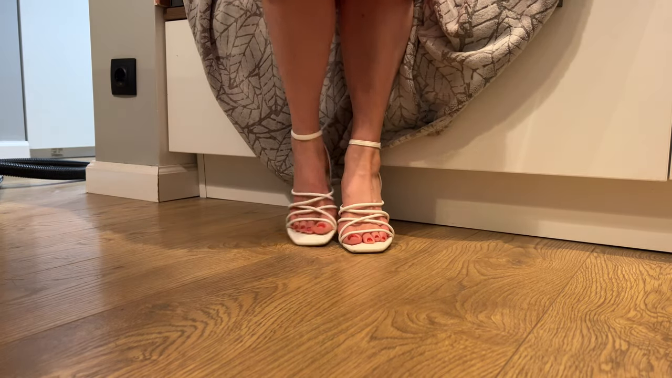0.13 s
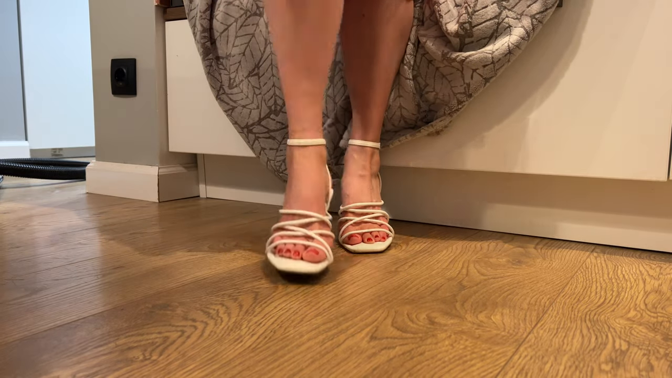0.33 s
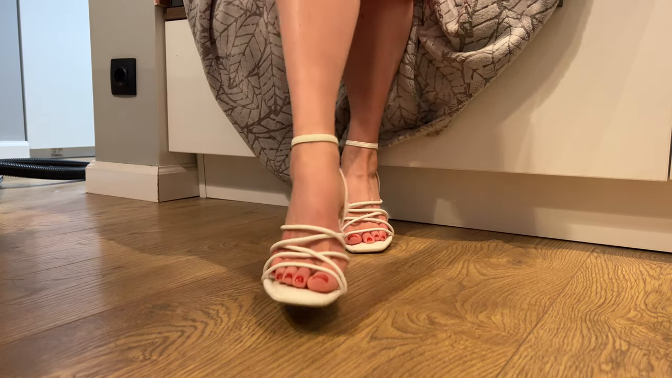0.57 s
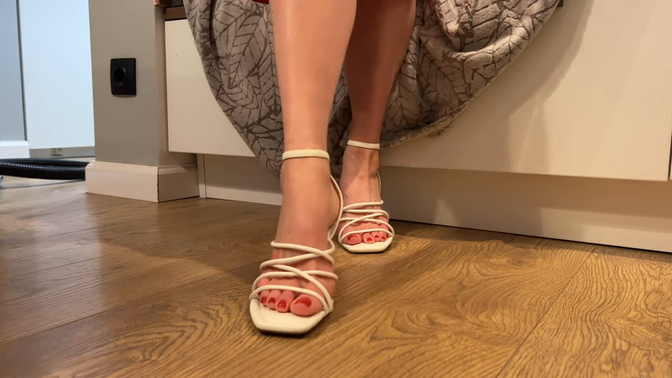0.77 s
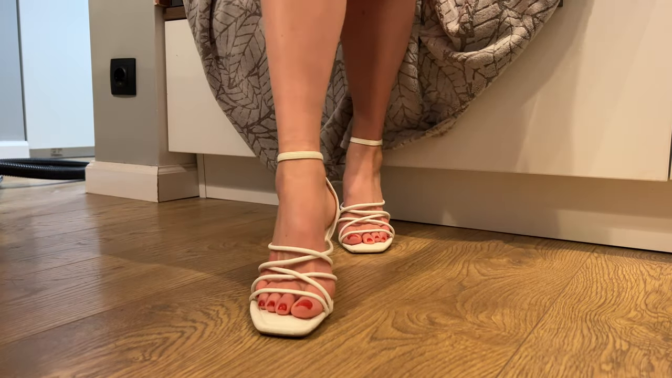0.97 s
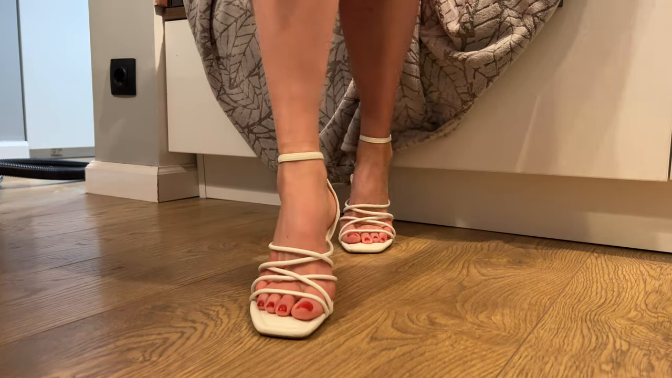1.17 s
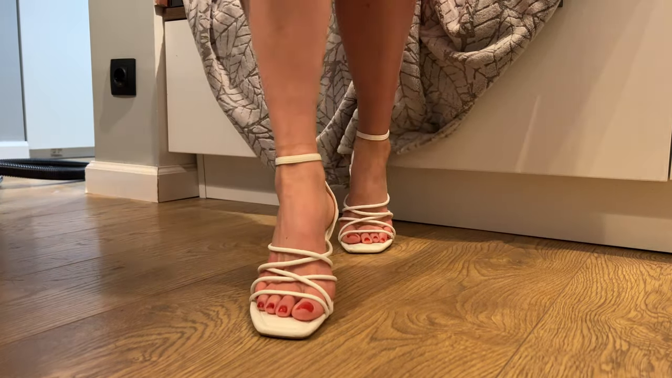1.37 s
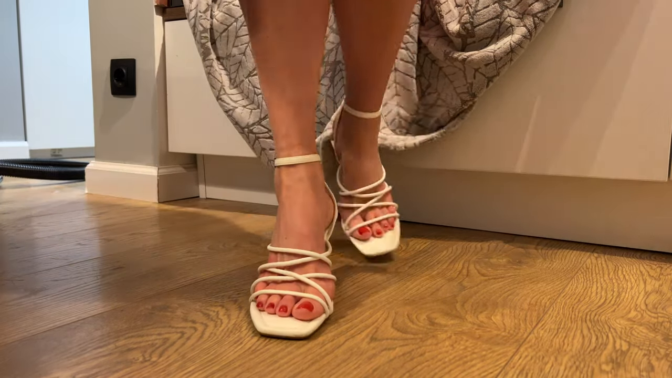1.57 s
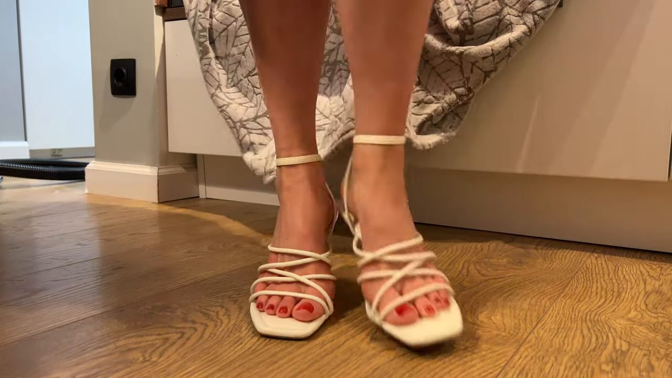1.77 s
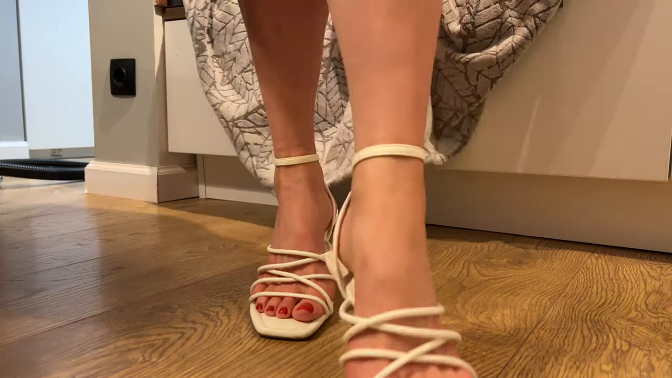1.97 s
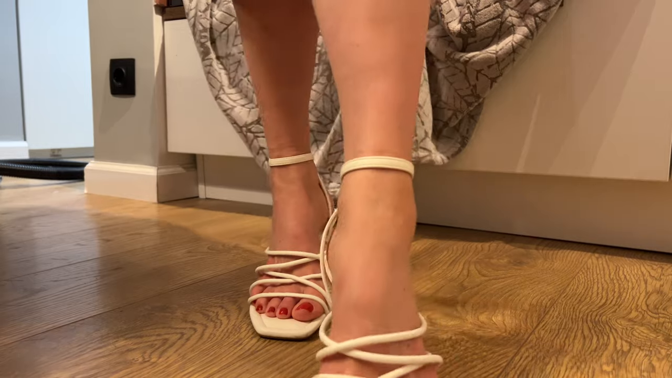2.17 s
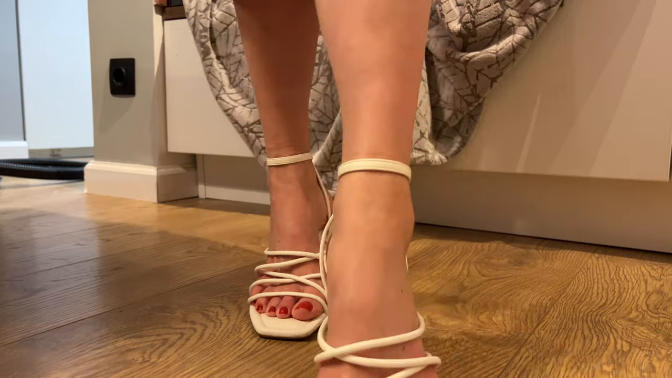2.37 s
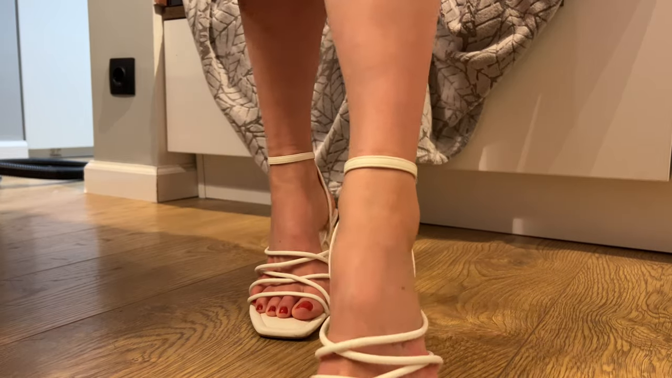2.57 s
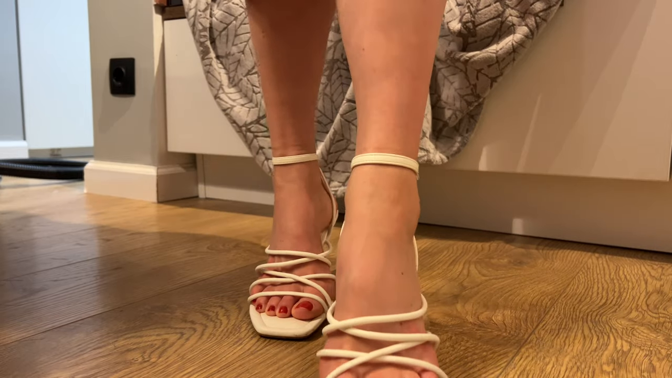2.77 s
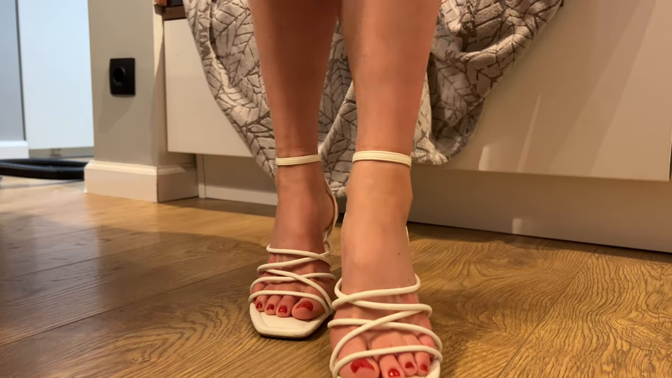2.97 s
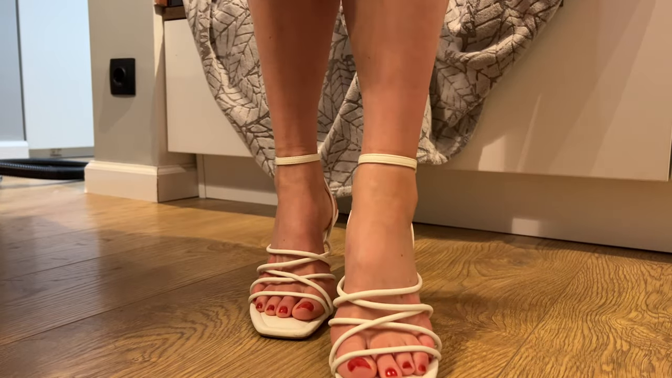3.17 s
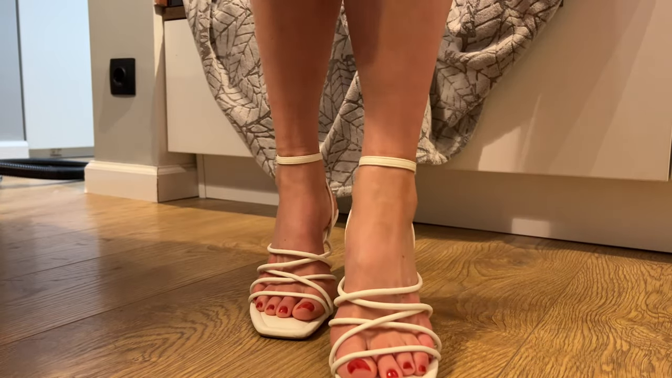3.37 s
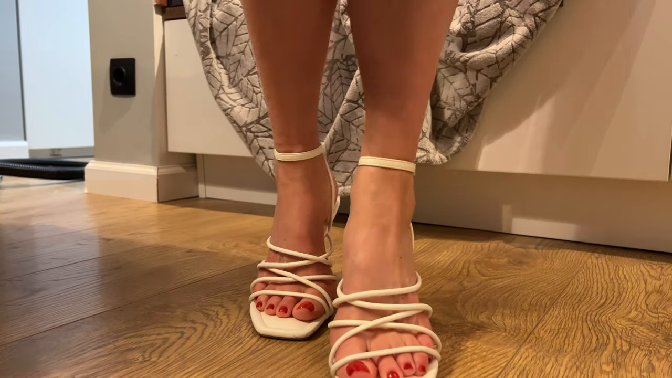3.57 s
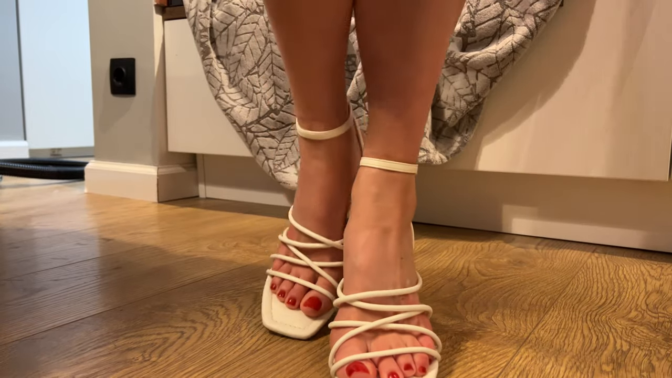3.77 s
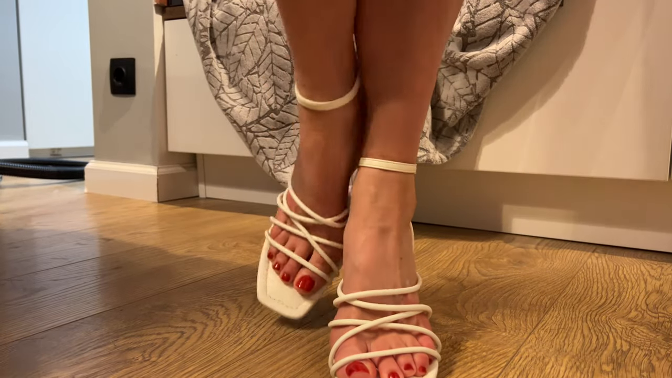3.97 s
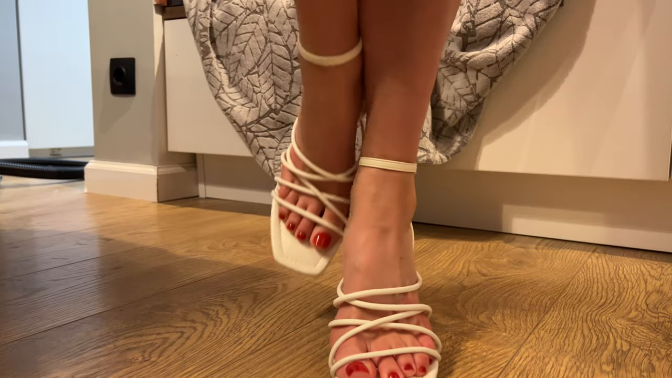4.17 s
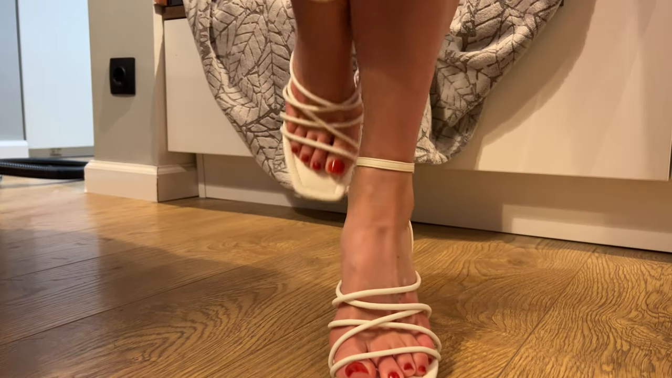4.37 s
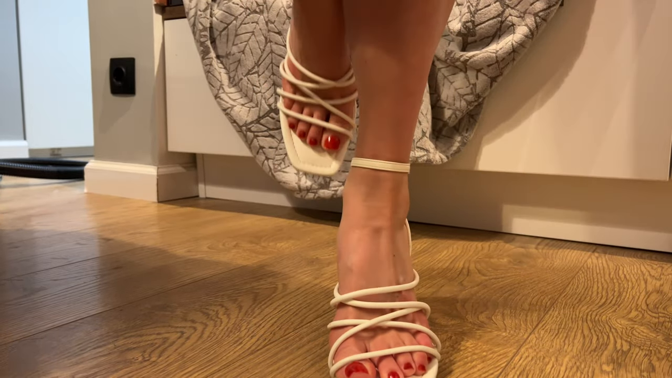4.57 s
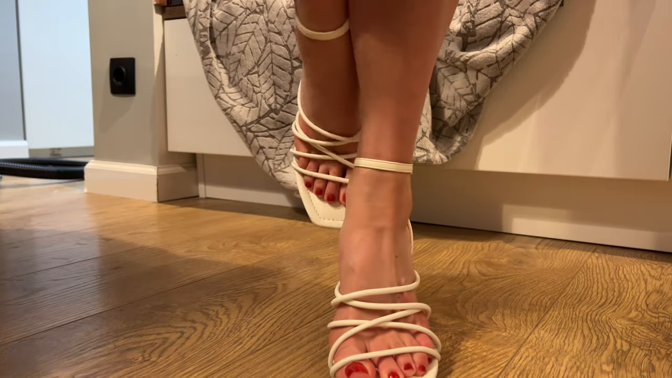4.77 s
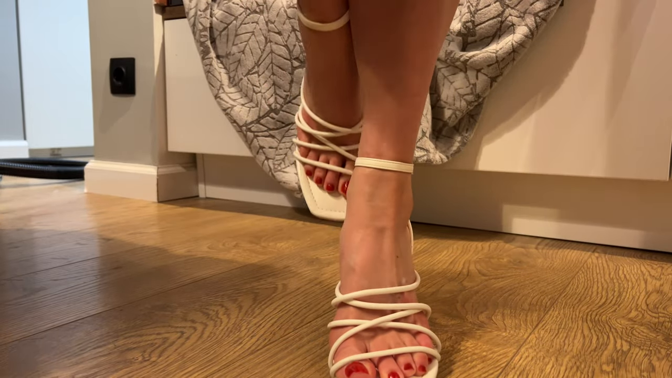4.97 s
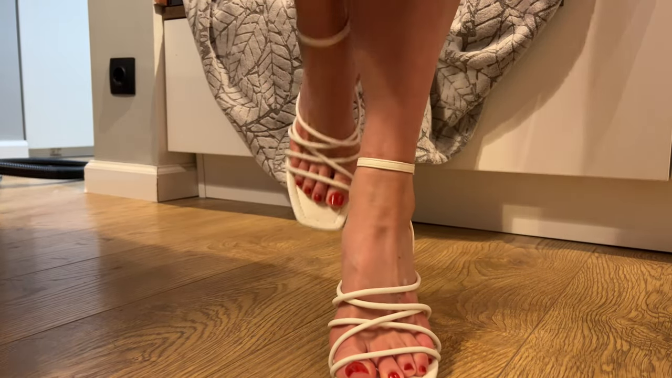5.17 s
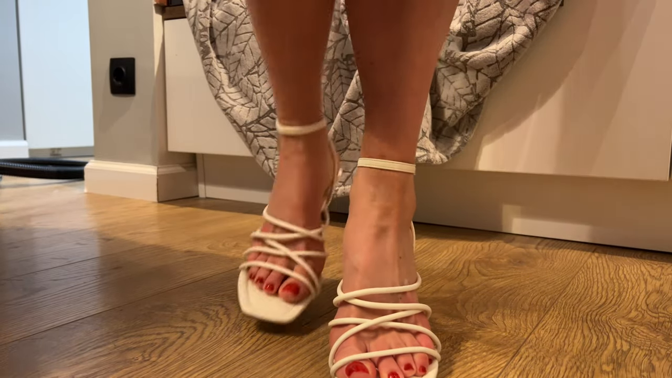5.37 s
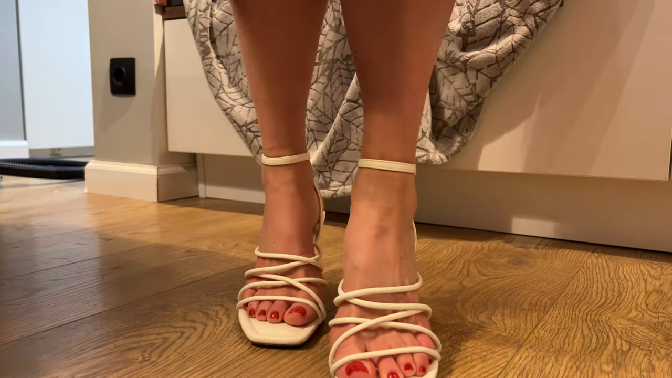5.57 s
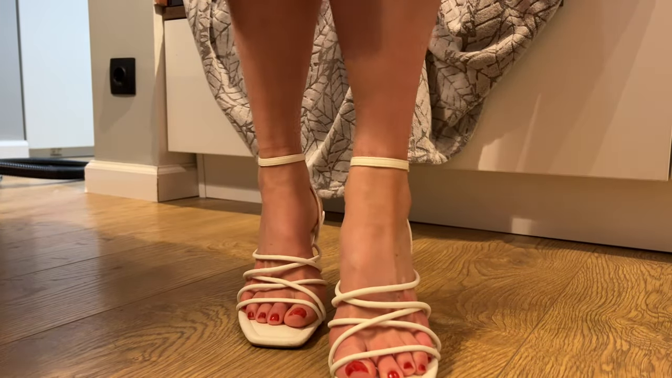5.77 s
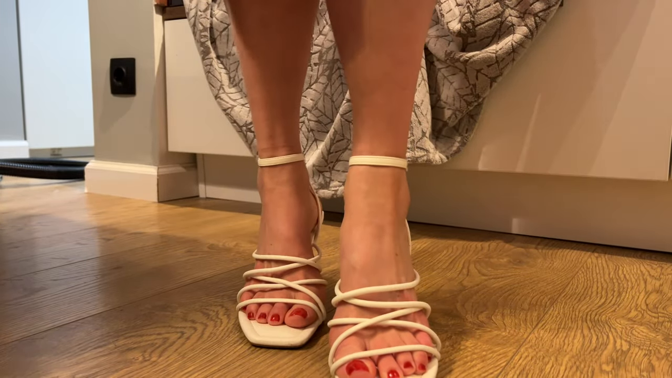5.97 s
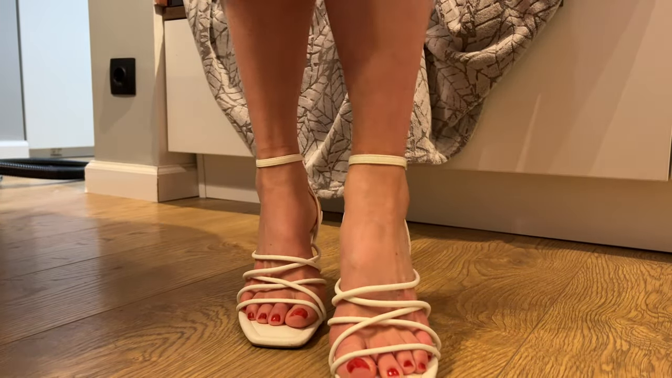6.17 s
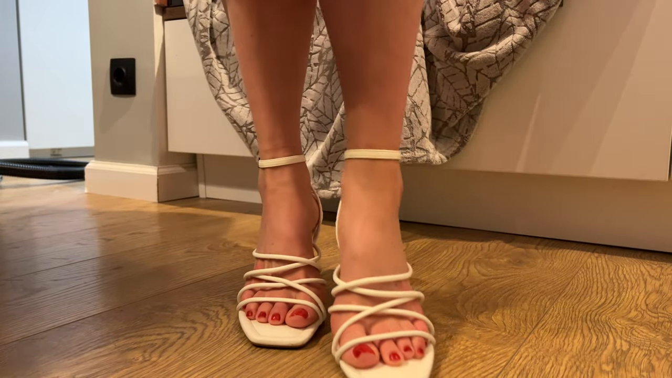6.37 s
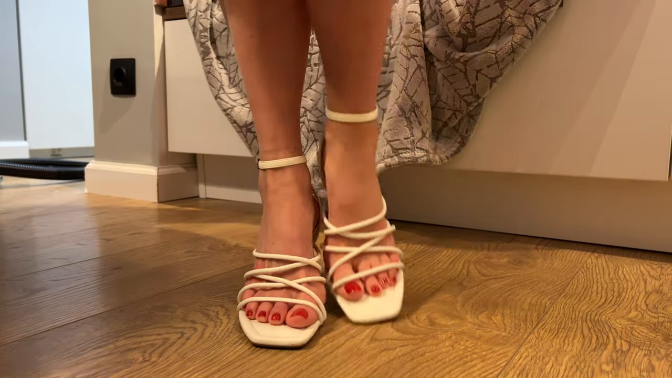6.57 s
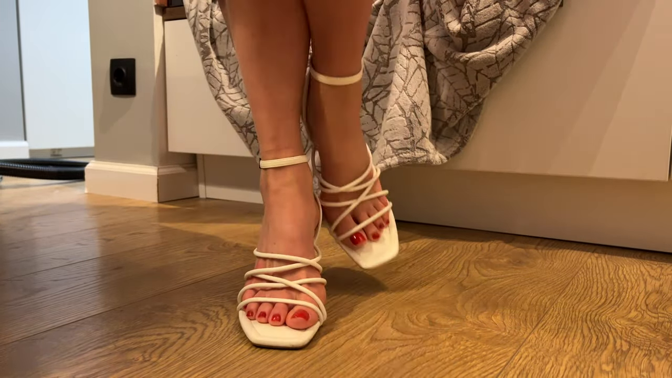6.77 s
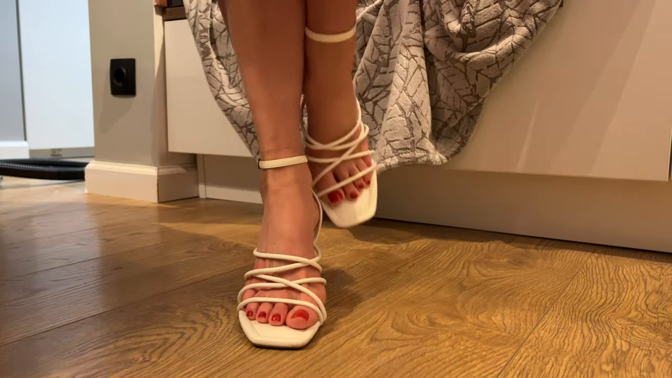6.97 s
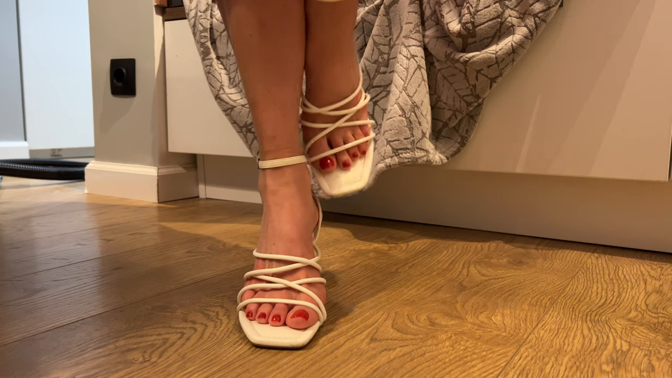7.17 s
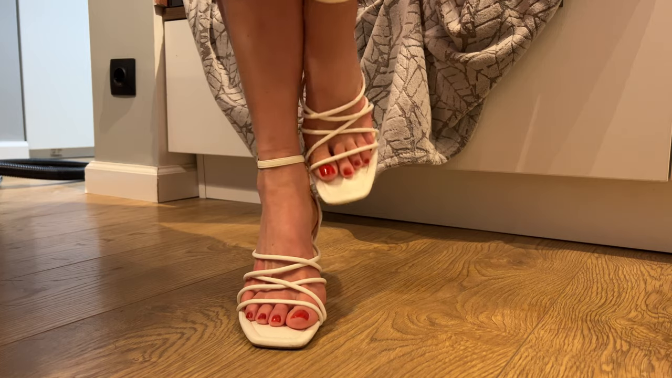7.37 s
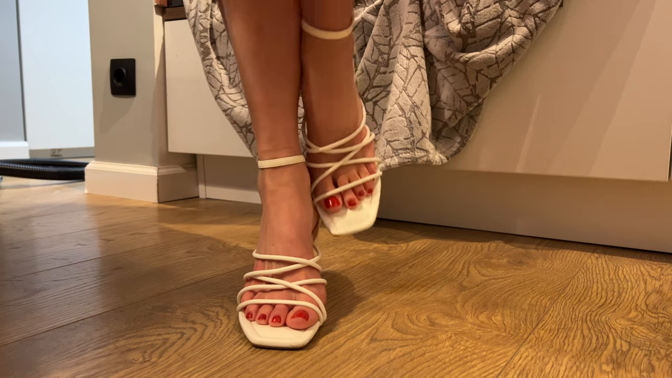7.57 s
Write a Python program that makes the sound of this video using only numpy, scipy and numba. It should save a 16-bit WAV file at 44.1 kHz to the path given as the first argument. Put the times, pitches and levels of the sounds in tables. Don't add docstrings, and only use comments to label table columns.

```python
import sys
import numpy as np
from scipy import signal
from scipy.fft import rfft, irfft, next_fast_len
from scipy.io import wavfile
from scipy.ndimage import uniform_filter1d
from numba import njit

SR = 44100
rng = np.random.default_rng(int(sys.argv[2]) if len(sys.argv) > 2 else 0)


def generate_wav(signal):
    frames = np.transpose(np.atleast_2d(signal))
    scaled = np.clip(frames, -1, 1) * 32767
    pcm = np.round(scaled).astype(np.int16)
    wavfile.write(sys.argv[1], SR, pcm)


def field_ratio(decibels):
    return 10 ** (np.asarray(decibels, dtype=float) / 20)


N = 335601
T = np.arange(N) / SR
SIZE = next_fast_len(N + SR)


def unit(x):
    return x / np.sqrt(np.mean(x ** 2))


def colour(x, points):
    hz, db = np.transpose(points)
    f = np.maximum(np.fft.rfftfreq(SIZE, 1 / SR), 1)
    gain = field_ratio(np.interp(np.log(f), np.log(hz), db, left=-90, right=-90))
    return irfft(rfft(x, SIZE) * gain, SIZE)[..., :N]


def band(x, lo_hz, hi_hz, order=2):
    sos = signal.butter(order, [lo_hz, min(hi_hz, 20000)], "band", fs=SR, output="sos")
    return signal.sosfilt(sos, x)


def walk(rate):
    k = int(SR / rate)
    levels = np.repeat(rng.standard_normal(N // k + 1), k)
    smooth = uniform_filter1d(uniform_filter1d(levels, k), k)
    return unit(smooth[:N])


def pair(mid, side):
    return np.array([mid + side, mid - side])


def panned(x, pan_db):
    return np.array([x * field_ratio(pan_db / 2), x * field_ratio(-pan_db / 2)])


@njit
def svf(x, hz, q):
    y, b, l = np.empty(len(x)), 0., 0.
    for i in range(len(x)):
        g = np.tan(np.pi * hz[i] / SR)
        v = (b + g * (x[i] - l)) / (1 + g * (g + 1 / q))
        b, l, y[i] = 2 * v - b, l + 2 * g * v, v / q
    return y


def air():
    # pitch_hz, level_db
    air_mid = [(25, -51), (40, -1.5), (60, 3.5), (90, 3), (150, -3.5), (300, -8.5), (420, -10), (600, -16),
               (1000, -18), (1300, -29.5), (1700, -26), (3000, -39), (8000, -40.5), (15900, -38.5)]
    air_side = [(25, -25), (60, 0.5), (150, -5), (300, -10), (600, -14), (1200, -25), (1700, -31.5),
                (3000, -39.5), (8000, -40), (11500, -59), (12500, -77), (15900, -81.5)]
    mid = colour(rng.standard_normal(N), air_mid)
    side = colour(rng.standard_normal(N), air_side)
    return pair(mid, side) / np.std(mid) * field_ratio(-61 + walk(2.48))


def fridge():
    # pitch_hz, peak_db, crest_s, left_minus_right_db
    hum = [
        (100.02, -37.7, 0, 1.7),
        (200.04, -69, 0, -1),
    ]
    # multiple of the motor speed, peak_db
    motor_orders = [
        (1, -62.5),
        (2, -49),
        (3, -69.5),
        (4, -100),
    ]
    # pitch_hz, width_hz, level_db
    panels = [(214.5, 8.4, -76), (292, 3.3, -78), (400, 0.96, -74), (602, 2.1, -74.5), (1201, 25, -82)]
    motor_hz, beat_crest_s = 49.378, 0.69
    t = T - beat_crest_s
    buzz = sum(panned(field_ratio(db) * np.cos(2 * np.pi * hz * (t - s)), pan_db) for hz, db, s, pan_db in hum)
    motor = sum(field_ratio(db) * np.cos(2 * np.pi * k * motor_hz * t) for k, db in motor_orders)
    casing = 0
    for hz, width, db in panels:
        rattle = svf(rng.standard_normal(N), np.full(N, 1. * hz), hz / width)
        casing = casing + field_ratio(db) * unit(rattle)
    buzz[1] = np.roll(buzz[1], -9)
    return buzz + panned(motor + casing, 0.44)


def strokes(table, weight_db, roundness):
    # lower, upper body (dB per dB of sheen)
    tilt = [-0.36, 0.53]
    edge_db = -23.5
    power = np.zeros((4, N))
    for s, rise, fall, db, sheen_db in table:
        near = slice(max(int((s - 2 * rise) * SR), 0), int((s + 2 * fall) * SR))
        away = np.where(T[near] < s, (s - T[near]) / rise, (T[near] - s) / fall)
        parts_db = np.array([tilt[0] * sheen_db - 3, tilt[1] * sheen_db - 1.5, sheen_db, weight_db])
        power[:, near] += np.outer(field_ratio(parts_db), field_ratio(db + edge_db * away ** roundness)) ** 2
    return power


def brush():
    # crest_s, rise_s, fall_s, body_db, sheen_db (re body)
    scuffs = [(0.005, .03, 0.16, -75, 0), (0.135, 0.082, 0.09, -64, -4.5), (0.7, 0.3, 0.06, -80, 0),
              (1.13, 0.23, 0.067, -83, -9), (1.515, 0.16, 0.11, -74, -2), (1.694, .12, 0.056, -68.5, -0.5),
              (2.0, 0.059, 0.069, -92, 10), (2.68, 0.19, .25, -61, -1), (2.77, .1, .1, -62, 1),
              (2.874, .16, 0.2, -52.5, -3.5), (3.38, 0.053, 0.49, -71, 1), (3.52, 0.088, 0.27, -67.5, 0.5),
              (3.83, 0.11, 0.22, -64, 0.5), (4.03, 0.09, 0.16, -62, -4), (4.77, .02, .08, -61, -5),
              (5.463, 0.0091, 0.044, -69, -19), (5.68, 0.3, 0.093, -70, 3), (6.03, 0.29, 0.077, -76.5, 0.5),
              (6.36, 0.18, 0.22, -73, 3), (6.45, 0.16, 0.18, -56, -2), (6.88, 0.28, 0.14, -70, 4.5)]
    # crest_s, rise_s, fall_s, body_db, sheen_db (re body)
    rubs = [(1.79, 0.035, 0.017, -74, 10.5), (4.13, 0.081, 0.16, -67.5, 3), (4.34, 0.24, .2, -64.5, 7),
            (4.7, 0.069, 0.14, -64.5, 8), (5.02, 0.068, 0.25, -79, 11.5), (5.27, 0.14, 0.18, -63, -0.5),
            (5.4, 0.056, 0.048, -69, -1), (6.69, 0.068, 0.12, -68, 3.5), (6.98, 0.059, 0.31, -66, 5.5),
            (7.17, 0.17, .12, -80.5, 8), (7.45, .07, 0.12, -77, 8), (7.58, 0.13, .2, -72.5, 8),
            (0.85, 0.3, 0.9, -82, 3), (6.48, 0.019, 0.055, -55, -3)]
    # pitch_hz, level_db
    grain_mid = [(350, 7.5), (600, 1.5), (688, -7), (811, 4.5), (881, -3), (2240, -10.5), (3240, -4.5),
                 (4090, -5.5), (4960, -10), (7690, 0), (8350, -3), (10700, -25.5), (11400, -15),
                 (13700, -16), (15900, -24.5)]
    grain_side = [(350, -11), (600, 4), (643, -3), (747, -10.5), (869, -2.5), (1040, -13.5), (2270, -18),
                  (3290, -7.5), (7080, -13), (7580, -7.5), (11300, -23.5), (12400, 0), (13300, -50),
                  (14800, -10.5), (15900, -41.5)]
    rest_db = [-87, -94, -89.5, -83.5]
    part_pan_db = [4.3, 5, 0.3, 1.5]
    part_bands_hz = [(2600, 5400), (5400, 10500), (10500, 17000), (600, 2600)]

    power = strokes(scuffs, weight_db=-1.5, roundness=2.18) + strokes(rubs, weight_db=-13, roundness=3.6)
    gains = np.sqrt(power + field_ratio(np.array(rest_db))[:, None] ** 2)
    grain = rng.standard_normal((2, N)) * field_ratio(2.2 * rng.exponential(size=N))
    mid = colour(grain[0], grain_mid)
    side = field_ratio(1) * colour(grain[1], grain_side)
    out, flicker = 0, walk(30)
    for (lo_hz, hi_hz), gain, pan_db in zip(part_bands_hz, gains, part_pan_db):
        both = band(np.array([mid, side]), lo_hz, hi_hz, order=3)
        hiss = pair(*both) / np.std(both[0])
        out = out + hiss * panned(gain, pan_db) * field_ratio(1.93 * flicker + 1.0 * walk(9))
    return out


def drag():
    # time_s, level_db, board_pitch_hz
    heavy = [
        (2.52, -66.5, 328),
        (2.652, -42.5, 255),
        (2.691, -44.5, 286),
        (2.741, -46, 283),
        (2.79, -37, 301),
        (2.842, -47, 375),
        (2.882, -37, 380),
        (3.016, -54.5, 334),
        (3.129, -80, 278),
    ]
    # time_s, level_db, board_pitch_hz
    light = [
        (6.28, -70, 400),
        (6.311, -62, 400),
        (6.38, -65, 382),
        (6.45, -53, 408),
        (6.53, -63, 402),
        (6.6, -66, 380),
        (6.63, -79, 385),
    ]
    s, db, hz = np.transpose(heavy + light)
    pitch, load_db = np.interp(T, s, hz), np.interp(T, s, db)
    sliding = sum((T > part[0][0]) & (T < part[-1][0]) for part in (heavy, light))
    jolts = rng.standard_normal(N) * (rng.random(N) < 2500 / SR)
    board = unit(band(svf(svf(jolts, pitch, 2.6), pitch, 2.1), 300, 4000, order=2))
    upper = unit(svf(svf(jolts, 1.7 * pitch, 1.1), 1.7 * pitch, 1.1))
    sizzle = unit(svf(rng.standard_normal(N), np.full(N, 4880.), 7.8))
    upper_db = -12 - 0.44 * (load_db + 46)
    rubbing = board + field_ratio(upper_db) * upper + field_ratio(-23.0) * sizzle
    return panned(rubbing * field_ratio(load_db + 1.5) * sliding, .6)


def packet(t, hz, swell_s):
    shape = (t / swell_s * np.exp(1 - t / swell_s)) ** 4
    return shape * np.sin(2 * np.pi * hz * (t + .0006 * (1 - np.exp(-t / .001))))


def graze(t, hz, ring_s):
    tick = np.sin(2 * np.pi * hz * t) * t / ring_s * np.exp(1 - t / ring_s)
    return tick + field_ratio(-16.5) * packet(t, 450, 0.0053)


def blow(t, tick_db, slap_db, hz, tick_hz, crack_db):
    clatter = rng.standard_normal(len(t)) * np.exp(-t / 0.0052)
    tick = band((t == 0) * -1. + 0.13 * clatter, tick_hz / 2.4, tick_hz * 1.092, order=2)
    crack = field_ratio(crack_db) * band(9.0 * (t == 0) + clatter, 2000, 4330, order=1)
    slap = packet(t, 1.46 * hz, 0.0015)
    board = packet(t, .95 * hz, .0036)
    thud = field_ratio(-16.0) * packet(t, 252, 0.0052) + field_ratio(-23) * packet(t, 149.0, 0.013)
    tip = tick / np.abs(tick).max() + crack
    return board + thud + field_ratio(tick_db + 14.0) * tip + field_ratio(slap_db - 1.0) * slap


def knocks():
    # start_s, board_peak_db, tick_db (re board), slap_db (re board), board_pitch_hz
    landings = [(0.726, -16, -39.5, -12.5, 537), (0.88, -26.5, -28, -7.5, 509), (1.06, -40, -33.5, -2, 540),
                (2.132, -22, -43, -14, 432), (2.144, -15.5, -37, -15, 508), (2.493, -48.5, -20.5, -12, 644),
                (3.36, -44, -23.5, -4.5, 516), (3.784, -44.5, -18.5, 6.5, 423),
                (4.008, -37, -16.5, -11, 476), (4.754, -29.5, -37, -7.5, 480),
                (5.458, -49, -18.5, -22, 684), (5.524, -20, -20, -30, 450), (5.593, -20, -37, -4.5, 493),
                (6.28, -40.5, -21, -0.5, 507), (6.396, -30, -28, -20, 530)]
    # start_s, board_peak_db, slap_db
    # (re board), board_pitch_hz
    lesser_knocks = [(0.734, -34, -6.5, 645), (0.743, -23.5, -28, 428), (0.753, -29.5, -6, 587),
                     (0.762, -28, -9, 469), (0.779, -37, -20, 514), (0.823, -41.5, -14, 565),
                     (2.622, -46.5, -27, 510), (0.887, -44, -18, 517), (1.438, -54, -8, 576),
                     (2.152, -29, -24, 488), (2.168, -35, -34, 374), (2.15, -44.5, -32.5, 194),
                     (4.755, -35, -28, 180), (5.534, -35, 11.5, 408), (5.548, -40.5, 13, 573),
                     (5.566, -52, -9, 437), (5.606, -36, -0.5, 660)]
    # start_s, tick_peak_db, tick_pitch_hz, ring_s
    grazes = [(0.078, -45, 2900, 0.00022), (0.143, -52.5, 2380, 0.00093), (0.167, -55, 1500, 0.00054),
              (1.917, -67, 2100, 0.0011), (1.9888, -44, 2010, 0.00018), (3.493, -42, 2410, .0003),
              (3.673, -59, 2200, 0.00054), (4.774, -46.5, 2000, 0.00043), (5.5228, -37.5, 2070, 0.00016),
              (6.364, -60, 2300, 0.00056), (6.385, -59, 2200, .0005), (6.652, -55, 1900, 0.00057),
              (6.664, -55, 1800, 0.0006), (6.688, -55, 2250, .0005), (6.7, -58, 2180, 0.00064)]
    # start_s, tick_peak_db, tick_pitch_hz, ring_s
    hardest = (2.1428, -25, 3800, .00006)
    # start_s, peak_db
    snap_times = [
        (0.876, -38),
        (0.9832, -44),
        (1.7753, -62),
        (2.1428, -37),
        (2.4912, -43.5),
        (3.492, -38),
        (4.0058, -25),
        (5.46, -41),
        (5.5198, -64),
    ]
    out, t = np.zeros(N + SR), T[:2600]
    hits = [(s, db, tick_db, slap_db, hz, 2300, -5.5) for s, db, tick_db, slap_db, hz in landings]
    hits += [(s, db, -32, slap_db, hz, 2000, -6) for s, db, slap_db, hz in lesser_knocks]
    for s, db, *character in hits:
        i = int((s - .001) * SR)
        out[i:i + len(t)] += field_ratio(db) * blow(t, *character)
    for s, db, hz, ring_s in grazes + [hardest]:
        i = int(s * SR)
        out[i:i + len(t)] += field_ratio(db) * graze(t, hz, ring_s)
    snaps = np.zeros(N)
    for s, db in snap_times:
        snaps[int(s * SR)] = field_ratio(db + 8)
    return panned(out[:N] + band(snaps, 5500, 25000), 0.7)


def room(x):
    # delay_s, level_db, left_minus_right_db
    walls = [(.0086, -18.5, 18), (.019, -23.5, -24.5), (0.0237, -18, 10), (.028, -31, 1.5)]
    # pitch_hz, time_to_fade_60_db_s, level_db
    octaves = [(154, 0.78, -19.5), (325, 0.31, -11), (590, 0.21, -9), (1186, 0.31, -4.5),
               (2056, 0.31, -8.5), (5400, 0.27, -4), (9700, 0.25, -6)]
    t = T[:SR // 2]
    shared, *apart = rng.standard_normal((3, len(t)))
    tail = 0
    for hz, t60, db in octaves:
        alike = np.clip(280 / hz, 0, .95)
        noise = alike * shared + np.sqrt(1 - alike ** 2) * np.array(apart)
        ring = band(noise, hz / np.sqrt(2), hz * np.sqrt(2))
        tail = tail + field_ratio(db - 19.5) * ring * np.exp(-np.log(1000) * t / t60)
    echoes = np.zeros_like(tail)
    for s, db, pan_db in walls:
        echoes[:, int(s * SR)] += panned(field_ratio(db), pan_db)
    response = tail * np.clip(t / 0.004, 0, 1) + band(echoes, 60, 2200, order=1)
    response[:, 0] += 1
    return irfft(rfft(x, SIZE) * rfft(response, SIZE), SIZE)[:, :N]


def scene():
    steps = room(knocks() + drag())
    steps[1] = np.roll(steps[1], 1)
    return steps + brush() + fridge() + air()


def band_limit(x):
    return signal.sosfilt(signal.butter(12, 16220, fs=SR, output="sos"), x)


def record(dry):
    # pitch_hz, level_db
    port_sum = [(20, 0), (9000, 0), (9800, -2.5), (10600, -8), (11100, -4), (15500, 2), (15800, -41)]
    port_difference = [(20, 1), (11500, 1), (12200, -21), (13300, -21), (14500, -12), (15500, -1),
                       (15800, -21)]
    # pitch_hz, level_db
    case_tone = [(20, 0), (6600, -0.5), (7200, 2.5), (7600, -5.5), (7950, -2.5), (20000, -3.5)]
    left, right = dry
    mid = colour(colour((left + right) / 2, port_sum), case_tone)
    side = colour((left - right) / 2, port_difference)
    return band_limit(pair(mid, side))


dry = scene()
out = record(dry)
generate_wav(out)
```